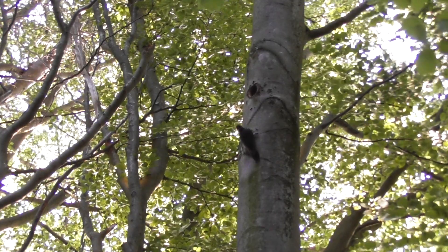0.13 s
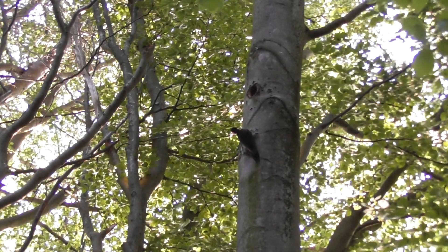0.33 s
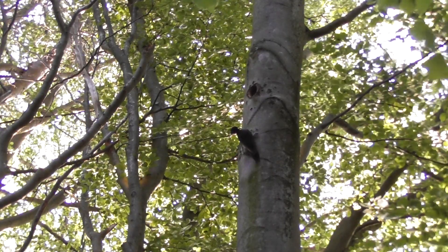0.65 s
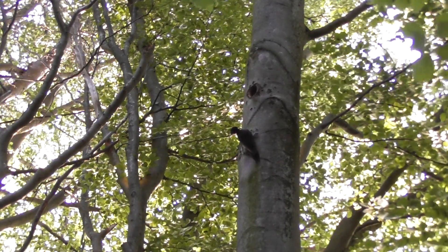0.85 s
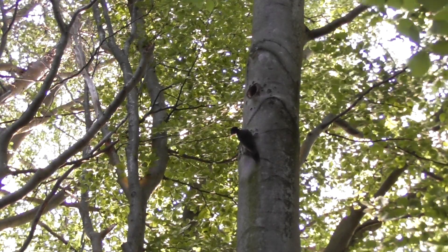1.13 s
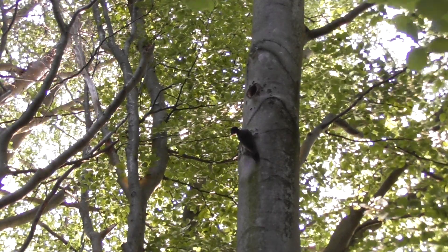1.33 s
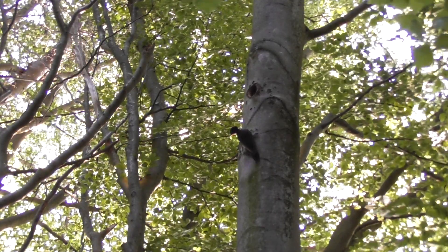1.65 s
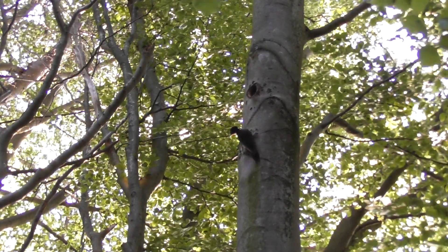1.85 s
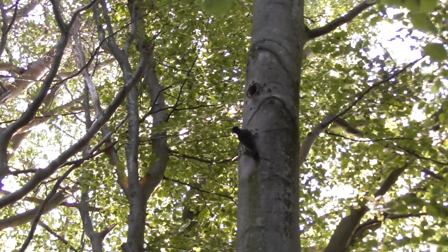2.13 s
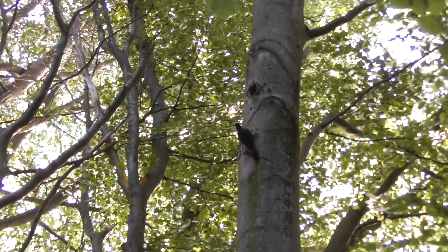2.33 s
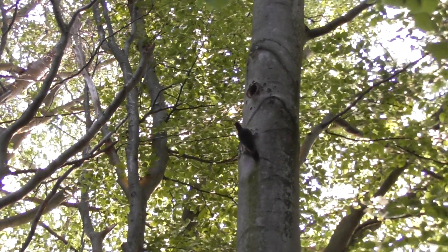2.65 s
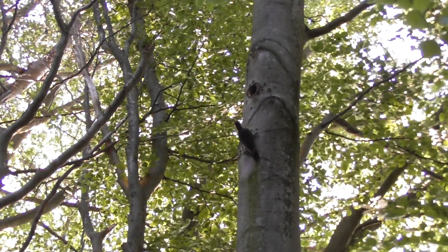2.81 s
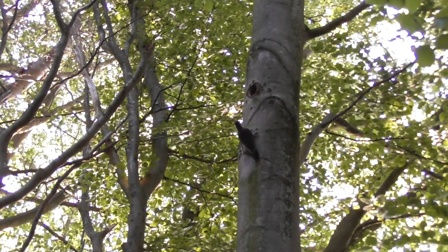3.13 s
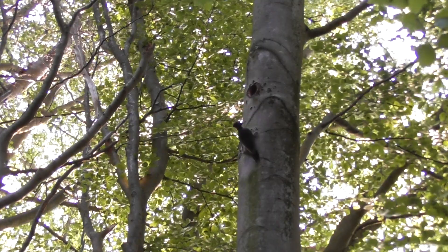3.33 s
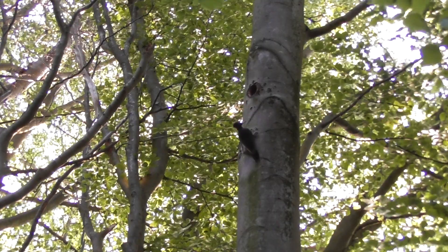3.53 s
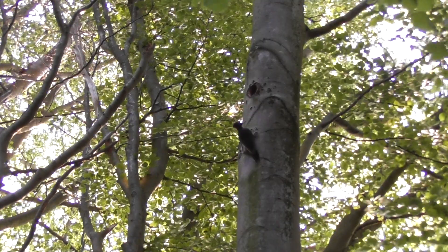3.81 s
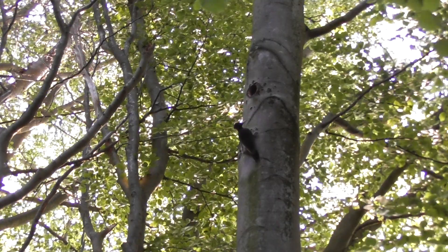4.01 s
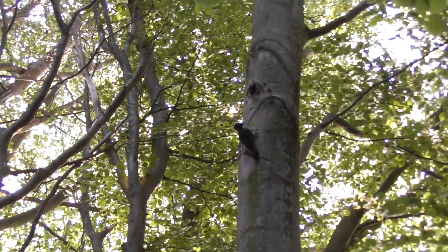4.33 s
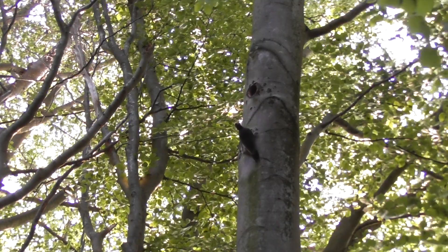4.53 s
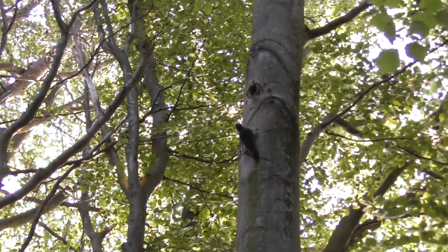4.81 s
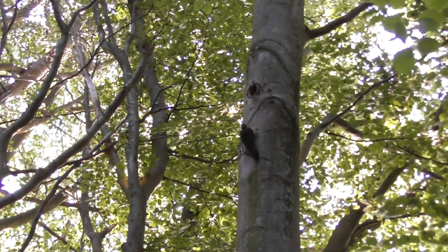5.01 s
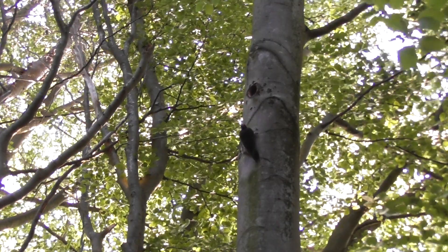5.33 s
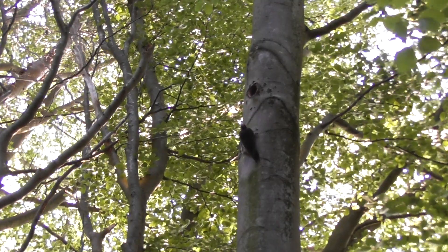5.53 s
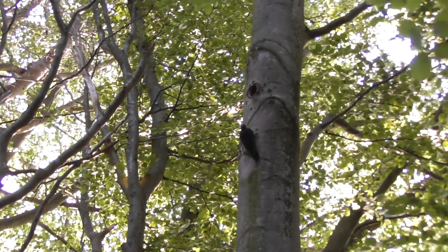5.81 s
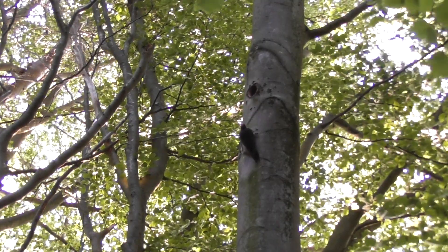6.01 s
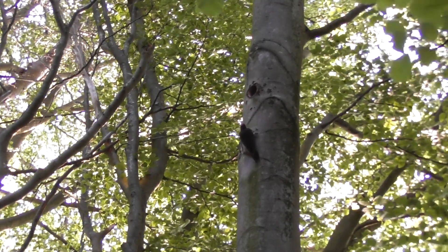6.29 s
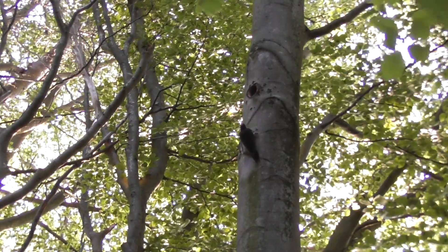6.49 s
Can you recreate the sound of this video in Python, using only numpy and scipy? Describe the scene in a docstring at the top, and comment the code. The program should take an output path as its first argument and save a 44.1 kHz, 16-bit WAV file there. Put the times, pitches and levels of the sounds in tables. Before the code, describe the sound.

A calm wood murmurs softly and broadly, low and leafy, throughout about 6.5 seconds. From the start young birds beg in short, raspy chirrs, one roughly every 0.27 seconds; each squeak climbs, breaks into roughness and ends in a faint hiss. Small low wind thumps touch the microphones, near 0.5, 1.9 and most clearly 3.0 seconds. From about 2.4 seconds a small songbird adds faint, thin notes, then a fast scratchy twitter from 3.3 to 3.8, and brighter sliding whistles from 4.2 to 5.35. At 5.1 a black woodpecker calls loudly: a sharp upward hook, then a clear, nearly level whistle, dipping slightly and swelling from 5.6, dropping suddenly at 6.1. Trunks and canopy return echoes and a diffuse tail. The chirrs, masked or paused early in the call, continue to the end.

```python
"""A black woodpecker gives one long whistled call, a harmonic voice with a sharp upward hook at its start.
Young birds beg all along, nearly four chirrs a second: harmonic squeaks that break into shaped noise.
A small songbird whistles and twitters in gliding pure tones.
Trunks and leaves scatter the calls as echoes and a noise tail; the wood murmurs in shaped noise,
and light air bumps the microphones in short low thumps of noise."""
import sys
import numpy as np
from scipy import signal
from scipy.fft import rfft, irfft, next_fast_len
from scipy.io import wavfile
from scipy.ndimage import uniform_filter1d

SR = 44100
rng = np.random.default_rng(int(sys.argv[2]) if len(sys.argv) > 2 else 0)


def store_wav(level_fs):
    """Save 16-bit WAV to argv[1]."""
    pcm = np.round(np.clip(np.atleast_2d(level_fs), -1, 1) * 32767)
    wavfile.write(sys.argv[1], SR, pcm.T.astype(np.int16))


N = 293706
T = np.arange(N) / SR  # time in seconds
TOP_HZ = 15900  # top of the audible band


def undb(db):
    """Decibels to gain."""
    return 10 ** (np.asarray(db) / 20)


def unit(x):
    """Scale to rms 1."""
    return x / np.sqrt(np.mean(x ** 2))


def curves(table, t):
    """Each column of a table after the first, joined by straight lines, at times t."""
    s, *columns = np.transpose(table)
    return [np.interp(t, s, c) for c in columns]


def response(points, hz):
    """Gain of a (Hz, dB) spectrum at the given frequencies, straight on a logarithmic pitch scale."""
    f, db = np.transpose(points)
    return undb(np.interp(np.log(np.maximum(hz, 1)), np.log(f), db))


def noise(points):
    """Noise of rms 1 with the given (Hz, dB) spectrum."""
    size = next_fast_len(N)
    white = rfft(rng.standard_normal(size))
    gain = response(points, np.fft.rfftfreq(size, 1 / SR))
    return unit(irfft(white * gain, size)[:N])


def walk(rate):
    """Smooth random wander of spread near 1 that takes a new direction rate times a second."""
    size = max(int(SR / rate), 1)
    steps = np.repeat(rng.standard_normal(N // size + 1), size)
    return 1.15 * uniform_filter1d(steps, size)[:N]


def wood(mid_db=-38.5, side_db=-38.3, swell_db=.6):
    """Far leaves and still air: broad shaped noise, swelling a little."""
    # The part both microphones share. Each row: frequency in Hz, relative level in dB
    shared_murmur = [(15, -28), (25, 9.5), (55, 6.5), (110, -2), (200, -1), (330, 2.5), (700, -1),
                     (1110, -7.5), (1660, -20), (2300, -9), (2850, -13), (3800, -1.5), (5140, -14),
                     (7900, -5), (11200, -20), (15500, -22)]
    # The part in which they differ. Each row: frequency in Hz, relative level in dB
    differing_murmur = [(20, -3), (55, 11), (95, -1), (400, -4.5), (850, -10.5), (1700, -22), (5000, -73),
                        (9000, -20), (15500, -28.5)]
    mid = noise(shared_murmur) * undb(mid_db + swell_db * walk(3.055))
    side = noise(differing_murmur) * undb(side_db + swell_db * walk(4))
    return np.array([mid + side, mid - side])


def chirr_course(t, smooth=.24, broken=0.483, break_s=0.0139):
    """Pitch, level and roughness at t seconds from a chirr's top, where the squeak breaks."""
    low_hz, top_hz, climb_s, fall_s = 610.2, 1399.6, .035, .036
    attack_db_per_s, hold_s, release_db_per_s = 258, .013, 1200  # held for hold_s either side of the top
    height = np.exp(np.minimum(t / climb_s, -t / fall_s))
    hz = low_hz + (top_hz - low_hz) * height
    slope = np.where(t < 0, attack_db_per_s, release_db_per_s)
    db = -slope * np.maximum(np.abs(t) - hold_s, 0)
    rough = smooth + (broken - smooth) * np.exp(np.minimum(t, 0) / break_s)
    return hz, db, np.clip(rough, .22, 1)


def nestlings(flutter=0.38, hiss_db=-12, hiss_lag_s=0.029, hiss_rise_s=0.041, hiss_fall_s=0.079):
    """Each chirr is a squeak that climbs in pitch, breaks into a rasp at its top and trails off in a hiss."""
    # Begging chirrs. Each row: time of the top in seconds, level there in dB
    chirrs = [(.163, -23), (.417, -23), (.696, -22), (.953, -23.5), (1.22, -25.5), (1.489, -25.5),
              (1.756, -25), (2.02, -24.5), (2.298, -25), (2.56, -23.5), (2.82, -23), (3.08, -21.5),
              (3.36, -22), (3.624, -22.5), (3.897, -22), (4.174, -22), (4.449, -21), (4.729, -20),
              (5.01, -21), (5.76, -25.5), (5.985, -23.5), (6.307, -21.5), (6.587, -21.5)]
    # Resonances of the young throat. Each row: frequency in Hz, relative gain in dB
    throat = [(600, -28.5), (900, -18), (1170, -13), (1450, -18.5), (1850, -14.5), (2200, -12),
              (3150, -8.5), (3680, 2), (4350, -1), (5000, -13.5), (6300, -7), (9000, -11.5), (11500, -27.5),
              (15500, -33)]
    # Breathy hiss around the end of a chirr. Each row: frequency in Hz, relative level in dB
    hiss_colour = [(3000, -34), (5200, -8), (6600, -2.5), (7900, -1), (9300, -11.5), (11500, -24),
                   (15000, -39)]
    usual_db, stretch_per_db = -22.5, 0.07  # louder chirrs last longer
    out = np.zeros(N)
    rasp, hiss, shake = noise(throat), noise(hiss_colour), walk(400)
    # quick jitter smears the upper harmonics; a slower wander makes every chirr different
    wobble = .1 * walk(1500) + .14 * walk(110)
    k = np.arange(1, 16)[:, None]  # harmonic numbers
    for s, db in chirrs:
        near = np.abs(T - s + .03) < .09  # from 0.12 s before the top to 0.06 s after
        length = np.exp(stretch_per_db * (db - usual_db))
        hz, shape_db, rough = chirr_course((T[near] - s) / length)
        hz = hz * (1 + .04 * rng.standard_normal())
        phase = 2 * np.pi * np.cumsum(hz * (1 + rough * wobble[near])) / SR
        # each harmonic flares as it sweeps through the throat's resonance
        weights = response(throat, k * hz) * (k * hz < TOP_HZ)
        start_phases = rng.uniform(0, 2 * np.pi, k.shape)
        squeak = unit(np.sum(weights * np.sin(k * phase + start_phases), axis=0))
        voice = np.sqrt(1 - rough) * squeak + np.sqrt(rough) * rasp[near]
        out[near] += undb(db + shape_db) * voice * (1 + flutter * rough * shake[near])
        around = np.abs(T - s) < .3
        t = T[around] - s - hiss_lag_s
        breath = np.exp(np.minimum(t / hiss_rise_s, -t / hiss_fall_s))
        out[around] += undb(db + hiss_db) * breath * hiss[around]
    return out


def air(side_db=-1, mid_db=-5):
    """Small eddies push on the two microphone ports unevenly."""
    # Bumps. Each row: centre in seconds, level in dB ahead of the mid and side gains, spread in seconds
    bumps = [(0.476, -22.5, 0.021), (1.854, -26, 0.063), (2.194, -28.5, 0.014), (2.631, -33, 0.086),
             (2.88, -27, 0.025), (2.961, -18.5, 0.012), (4.164, -36, .03), (5.716, -34, 0.044)]
    # Low rumble of a bump. Each row: frequency in Hz, relative level in dB
    rumble = [(15, -10), (45, -3), (80, -5.5), (150, -20), (400, -61)]
    push = sum(undb(db) * np.exp(-.5 * ((T - s) / spread) ** 2) for s, db, spread in bumps)
    mid = undb(mid_db) * noise(rumble)
    side = undb(side_db) * noise(rumble)
    return push * np.array([mid + side, mid - side])


def progress(length):
    """Runs from 0 to 1 over a note of the given length in seconds."""
    return np.linspace(0, 1, int(length * SR))


def add_note(out, s, hz, db, wobble):
    """Add a rounded pure note that starts at s seconds and follows the pitch hz."""
    on = slice(int(s * SR), int(s * SR) + len(hz))
    envelope = np.sqrt(2 * np.abs(np.sin(np.linspace(0, np.pi, len(hz)))))
    phase = 2 * np.pi * np.cumsum(hz * (1 + wobble[on])) / SR
    out[on] += undb(db) * envelope * np.sin(phase)


def songbird(waver=0.0072, flutter=0.22):
    """Thin whistles that slide and settle, and notes that arch, all nearly pure tones."""
    # Sliding whistles. Each row: start in seconds, length in seconds, first Hz, last Hz, level in dB
    whistles = [(2.449, .028, 3400, 2780, -44), (2.69, .058, 8800, 8400, -35.5),
                (2.928, 0.073, 8400, 8280, -33.5), (2.94, 0.031, 3390, 2760, -39),
                (3.499, 0.0303, 3500, 2800, -38), (3.99, 0.17, 2175, 2237, -44),
                (4.236, 0.13, 8500, 6520, -31), (4.469, 0.03, 6400, 4400, -30),
                (4.655, .057, 5820, 4900, -30), (4.922, 0.077, 4960, 4645, -23),
                (5.049, .032, 3550, 3700, -25), (5.151, 0.045, 4160, 4170, -20.5),
                (5.336, 0.024, 4040, 4190, -24.5)]
    # Arching notes. Each row: start in seconds, length in seconds, top Hz, level in dB
    arches = [(2.58, .03, 2400, -35.5), (3.092, 0.033, 2525, -36.5), (3.635, .036, 2527, -34),
              (4.213, .046, 2534, -35), (4.431, .05, 6820, -26.5), (4.63, 0.0257, 6350, -24.5),
              (4.733, 0.03, 2493, -34.5), (4.776, .025, 4980, -28.5), (4.804, .072, 5086, -29.5),
              (5.252, .05, 4410, -24.5)]
    settle = 1.8  # above 1, the slide is quick at first and slows into the last pitch
    crest, bend = .35, .24  # where in the note the top lies, depth of the arch
    out, wobble = np.zeros(N), waver * walk(600)
    for s, length, first, last, db in whistles:
        hz = last + (first - last) * (1 - progress(length)) ** settle
        add_note(out, s, hz, db, wobble)
    for s, length, top, db in arches:
        hz = top * (1 - bend * (progress(length) - crest) ** 2)
        add_note(out, s, hz, db, wobble)
    return out * (1 + flutter * walk(150))


def twitter(scratch=0.017):
    """The songbird's quick run of scratchy notes, each flicking upwards at its end."""
    # Short notes. Each row: start in seconds, starting pitch in Hz, level in dB
    flicks = [(3.302, 4240, -19.5), (3.323, 4220, -27), (3.344, 3756, -20.5), (3.378, 4230, -23),
              (3.398, 3790, -24), (3.463, 4370, -28.5), (3.517, 4490, -23.5), (3.543, 4430, -30),
              (3.566, 4150, -20), (3.585, 3850, -23.5), (3.609, 4110, -25.5), (3.679, 3900, -27),
              (3.72, 4150, -30), (3.748, 4180, -27), (3.772, 4100, -33), (3.824, 3950, -27)]
    length_s, flick = 0.0167, 0.176  # flick: rise as a share of the starting pitch
    out, wobble = np.zeros(N), scratch * walk(600)
    for s, hz, db in flicks:
        add_note(out, s, hz * (1 + flick * progress(length_s) ** 3), db, wobble)
    return out


def woodpecker(waver=0.00136, rasp=0.052, first_db=-33, third_db=-29.0, overtone_db=-17,
               first_hook_db=8, overtone_hook_db=7, third_hook_db=-12, third_drop_db=10,
               fade_db=2.5, patchy_db=4.5, leap_waver=.019):
    """One whistle that scoops up, hooks, holds and drops; the throat favours the second harmonic."""
    # Fundamental of the held note. Each row: time in seconds, pitch in Hz ahead of scoop, hook and drop
    held_pitch = [(5.09, 1527), (5.22, 1533), (5.46, 1565), (5.75, 1575), (5.85, 1590), (6.05, 1565)]
    # Effort of the bird. Each row: time in seconds, second-harmonic level in dB ahead of the hook's lift
    effort = [(5.09, -21), (5.22, -22), (5.33, -30), (5.44, -21.5), (5.55, -25), (5.64, -12), (5.77, -13.5),
              (5.88, -19), (6.03, -13), (6.07, -18.5)]
    # Weaker overtones. Each row: multiple of the fundamental, level in dB ahead of overtone_db
    overtone_levels = [(4, -31), (5, -21.5), (6, -28.5), (7, -34), (8, -45), (9, -50)]
    start_s, hook_s, end_s = 5.075, 5.116, 6.064
    attack_s, release_s = .011, 0.036
    scoop_hz, scoop_s, drop_hz_per_s = 90, .005, 13300
    hook_hz, hook_db, hook_rise_s, hook_fall_s = 266.2, 13, .0075, .019
    age, late = np.maximum(T - start_s, 0), np.maximum(T - end_s, 0)
    t = T - hook_s
    hook = np.exp(-np.abs(t / np.where(t < 0, hook_rise_s, hook_fall_s)) ** 1.5)
    scoop = scoop_hz * np.exp(-age / scoop_s)
    drop = drop_hz_per_s * np.minimum(late, release_s)
    hz = curves(held_pitch, T)[0] - scoop + hook_hz * hook - drop
    db = curves(effort, T)[0] + hook_db * hook
    # the voice is steady while held and unsteady where its pitch leaps
    leap = np.tanh(np.abs(np.gradient(hz)) * SR / 8000)
    phase = 2 * np.pi * np.cumsum(hz * (1 + (waver + leap_waver * leap) * walk(600))) / SR
    closing = np.minimum(late / release_s, 1)
    sounding = np.minimum(age / attack_s, 1) * (1 - closing)
    # only the resonant second harmonic swells with effort;
    # the hook lifts the third out of the resonance, the drop lowers it in
    second = undb(db) * (1 - closing) * np.sin(2 * phase)
    first = undb(first_db + first_hook_db * hook + fade_db * walk(12)) * np.sin(phase)
    shift_db = third_hook_db * hook + third_drop_db * closing
    third = undb(third_db + shift_db + fade_db * walk(12)) * np.sin(3 * phase)
    overtones = sum(undb(level + patchy_db * walk(20)) * np.sin(round(k) * phase)
                    for k, level in overtone_levels)
    voice = first + second + third + undb(overtone_db + overtone_hook_db * hook) * overtones
    return np.sqrt(2) * voice * sounding * (1 + rasp * walk(700))


def forest(x, wet_db, t60_s, side_db=-9, low_hz=2000, low_t60_s=1.19):
    """Near trunks return distinct echoes, the canopy a diffuse tail in which the low tones last longest."""
    # Echoes from near trunks. Each row: delay in seconds, level in dB against the direct sound
    trunks = [(.011, -10), (.024, -20), (.054, -21.5)]
    t = T[:SR]
    scatter = rng.standard_normal((2, SR))
    low = signal.sosfiltfilt(signal.butter(4, low_hz, fs=SR, output="sos"), scatter)
    low_tail = low * undb(-60 * t / low_t60_s)
    high_tail = (scatter - low) * undb(-60 * t / t60_s)
    tail = (low_tail + high_tail) * (1 - np.exp(-t / 0.003))
    mid, side = undb(wet_db) * tail / np.sqrt(np.sum(tail[0] ** 2))
    mid[0] += 1  # direct sound
    for delay, db in trunks:
        mid[int(delay * SR)] += undb(db)
    # the two close microphones differ mostly at short wavelengths
    side = undb(side_db) * np.diff(side, prepend=0)
    return np.array([signal.fftconvolve(x, mid + sign * side)[:N] for sign in (1, -1)])


def scene():
    """Birds in the trees over the murmur of the wood."""
    begging = forest(nestlings(), wet_db=-10.5, t60_s=1.0)
    song = forest(songbird(), wet_db=-1.5, t60_s=1.0) + forest(twitter(), wet_db=-2.5, t60_s=.9)
    call = forest(woodpecker(), wet_db=-6.5, t60_s=0.9)
    return wood() + begging + air() + song + call


def record(dry):
    """A steep low-pass filter in the recorder cuts the top of the treble."""
    return signal.sosfilt(signal.ellip(10, .2, 80, TOP_HZ, fs=SR, output="sos"), dry)


dry = scene()
out = record(dry)
store_wav(out)
```